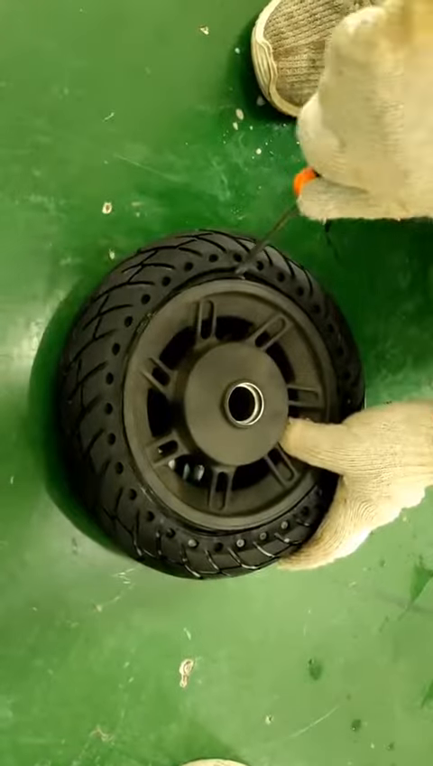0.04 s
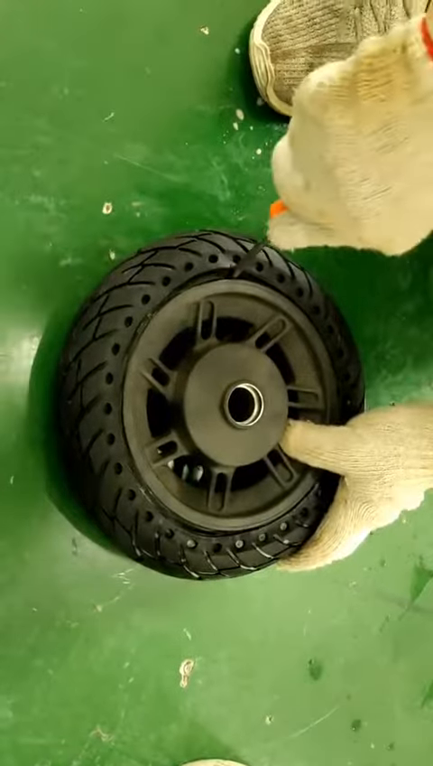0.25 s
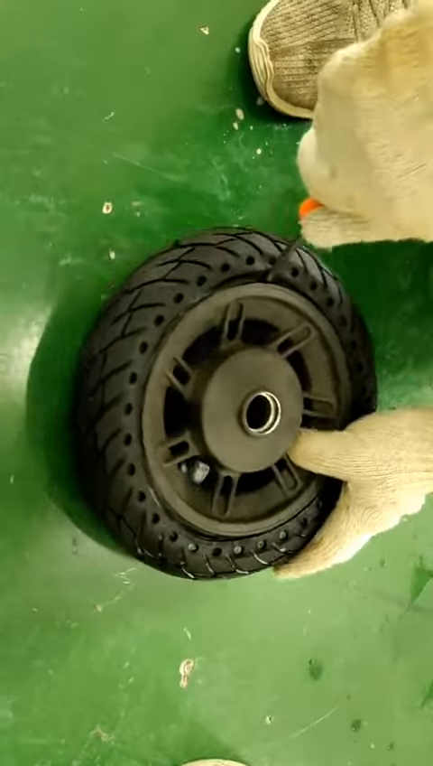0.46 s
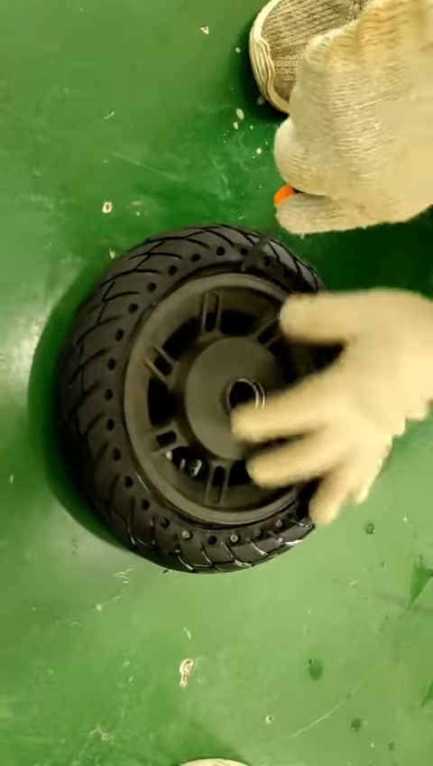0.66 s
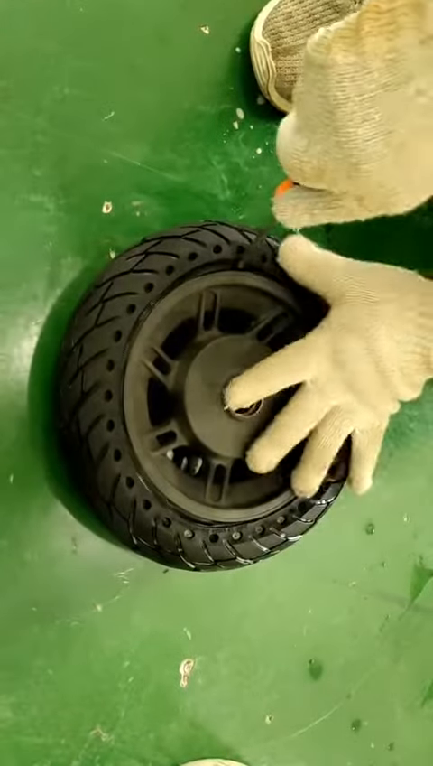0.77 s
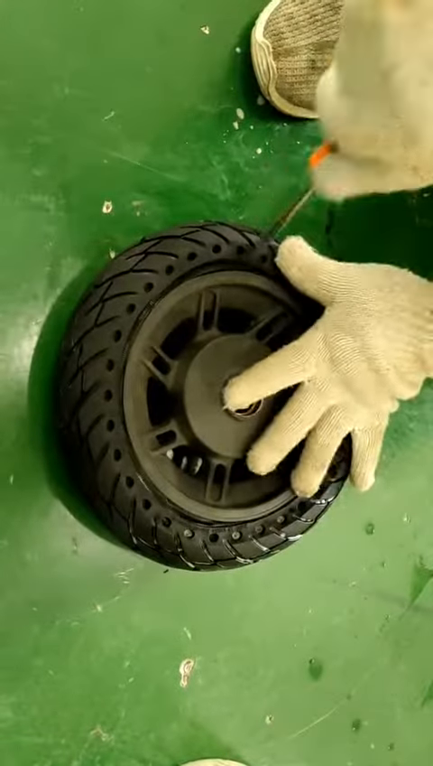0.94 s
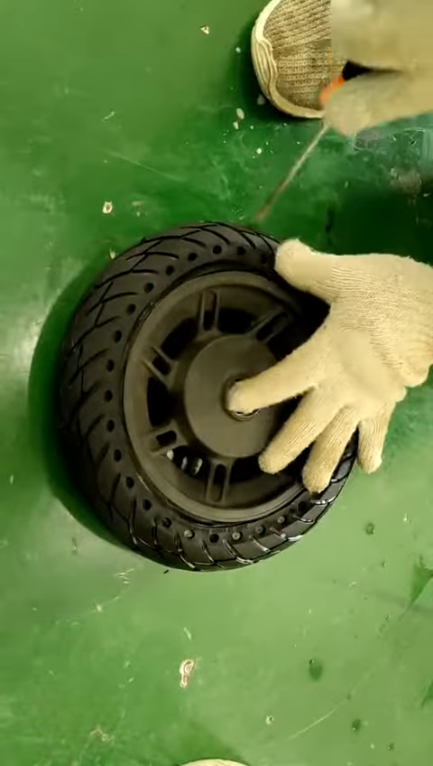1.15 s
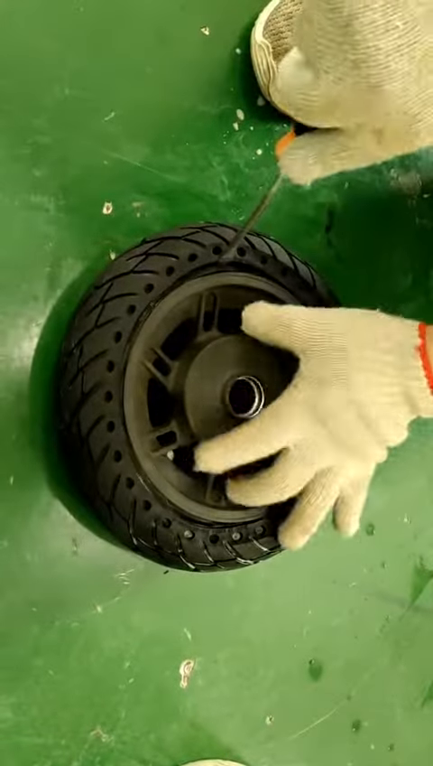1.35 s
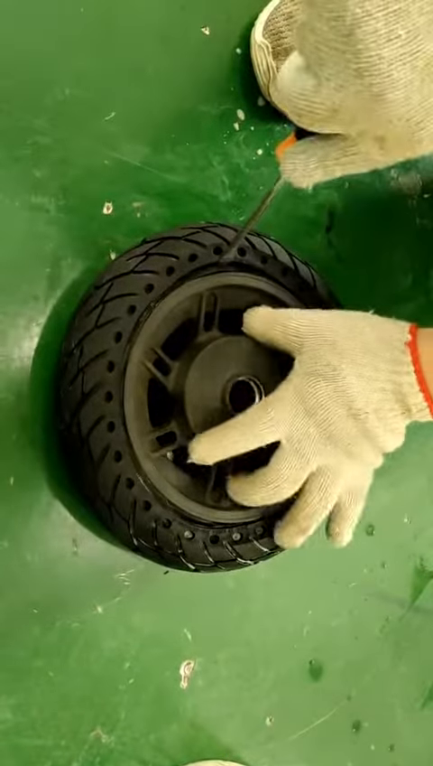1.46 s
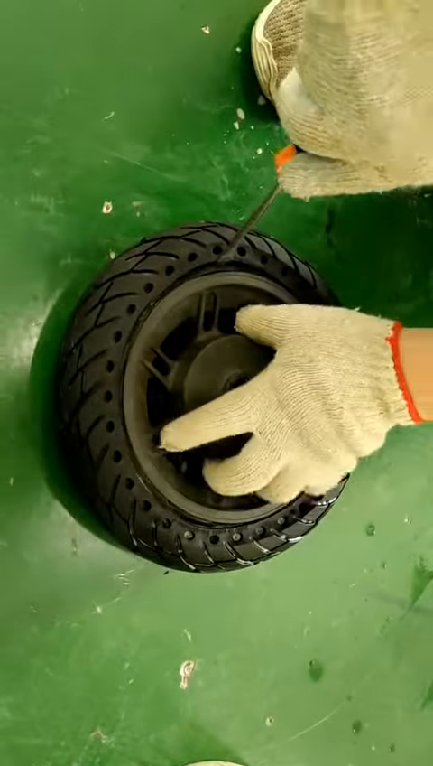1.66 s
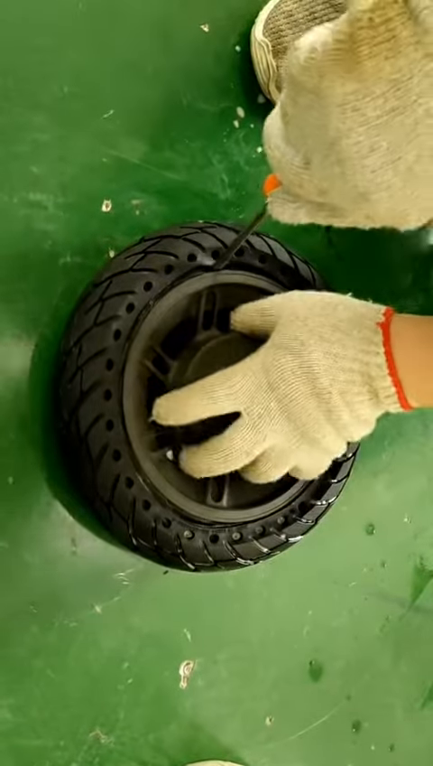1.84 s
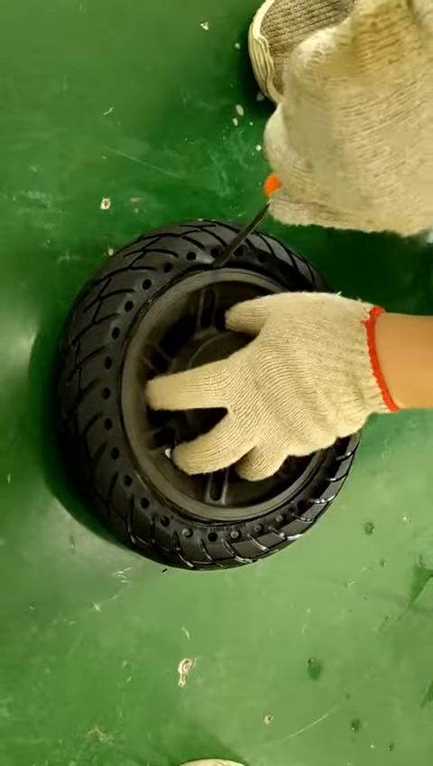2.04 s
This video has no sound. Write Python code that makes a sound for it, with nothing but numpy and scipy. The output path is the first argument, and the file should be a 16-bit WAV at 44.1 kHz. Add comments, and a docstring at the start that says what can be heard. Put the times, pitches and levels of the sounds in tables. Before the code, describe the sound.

Steel lever snaps loudly against a wheel rim, then soft knocks in a humming workshop.

```python
"""A workshop floor: a steel lever is worked between a small rubber tire and its rim.
Twice it slips, ever faster: the rubber squeaks and the steel jerks along with a short rising rasp.
The first slip ends in a hard snap on the rim that rings in the room. Gloved hands bump the wheel
over steady machine noise, and an automatic gain control ducks the mix after the snap."""
import sys
import numpy as np
from scipy import signal
from scipy.fft import rfft, irfft
from scipy.io import wavfile
from scipy.ndimage import uniform_filter1d, minimum_filter1d

SR = 44100
rng = np.random.default_rng(int(sys.argv[2]) if len(sys.argv) > 2 else 0)


def dump(signal):
    """Clip the signal to [-1, 1] and save it as 16-bit WAV at the path in sys.argv[1]."""
    limited = np.clip(np.atleast_2d(signal).T, -1, 1)
    pcm = np.round(limited * 32767).astype(np.int16)
    wavfile.write(sys.argv[1], SR, pcm)


N = 92610
T = np.arange(N) / SR

# The rubber's stick-slip glide, one list per slip: time_s, rate_hz, level_db
SLIPS = [
    [(.232, 614, -44), (.246, 701, -42.5), (.259, 795, -31.5), (.267, 1530, -41), (.274, 1463, -32.5),
     (.279, 1134, -26), (.286, 1090, -43)],
    [(.94, 600, -64), (.952, 679, -48), (.962, 706, -58), (.968, 737, -40), (.978, 770, -45),
     (.987, 833, -42), (.995, 1225, -43), (1.003, 1570, -46), (1.014, 1483, -42), (1.023, 1440, -51)],
]
# Tone of the rubber: freq_hz, gain_db
RUBBER_EQ = [(500, -51), (610, -11), (740, 11), (950, -2.5), (1180, -15), (1500, -1), (1800, -4),
             (2100, -25), (4000, -73)]
# Jerks of steel over the rim: centre_s, half_length_s, level_db, squeal_pitch_hz, hiss_db
STEEL_JERKS = [(0.25, 0.016, -43.5, 2376, -45.5), (0.2613, 0.0032, -28, 2554, -45),
               (0.2661, 0.0021, -23.5, 2700, -30.5), (0.2697, .0017, -30, 3250, -31),
               (.2755, .0024, -19, 2130, -39), (.2822, .0036, -26, 2160, -48),
               (.2781, 0.0022, -22, 3097, -26.5), (0.377, 0.0027, -34, 2800, -70),
               (0.961, 0.012, -52, 2800, -64), (.9765, 0.0019, -38, 2430, -62),
               (0.987, 0.0037, -45.5, 2760, -62), (.9972, 0.0056, -38, 2493, -55),
               (1.003, .004, -39, 2940, -48), (1.013, 0.0029, -31.5, 2994, -56),
               (1.0181, 0.0027, -40, 2420, -39.5), (1.034, 0.0074, -48, 2920, -54.5)]
# Resonances of lever and rim: pitch_hz, width_hz, gain_db
STEEL_BODY = [(2212, 270, -0.5), (2443, 335, 2), (2675, 290, 2), (3055, 200, 2), (3446, 310, -6.5),
              (3910, 400, -18)]
# Tone of the scraping hiss: freq_hz, gain_db
HISS_EQ = [(2500, -19), (4200, -6), (5600, -8.5), (6400, -5.5), (6980, 6), (7500, -13.5), (8800, -11),
           (9900, -41), (10700, -44), (11600, -9.5), (12300, -17)]
# The lever hits the rim and chatters once: start_s, level_db
SNAP_HITS = [(.2875, -2.5), (.2883, -9.5)]
# Short modes, the crack of the snap: pitch_hz, gain_db, t60_s
CRACK_MODES = [(784, -33.5, 0.046), (1230, -18, 0.019), (1710, -6.5, 0.0097), (2255, -8.5, 0.014),
               (2680, -1, 0.006), (2830, -42, 0.078), (3260, -45, .008), (6360, -23, 0.0092),
               (7700, -22, .006), (11200, -42, .008)]
# Long, faint ring of the metal: pitch_hz, gain_db, t60_s
RING_MODES = [(745, -11, .6), (1493, -8, .7), (2152, 0, .95), (2240, -3, .7), (2675, -4, .7),
              (2768, -1, .95), (3126, -9, .6)]
# Tone of the whole snap: freq_hz, gain_db
SNAP_EQ = [(400, -43), (560, -16), (700, 9), (1200, -2), (1600, -5), (2300, 0), (3500, -3), (4300, -22),
           (5500, -12), (6500, 0), (8600, -3), (9900, -30), (11500, 3)]
# Dull knocks of the wheel on the floor: start_s, level_db, pitch_hz, t60_s
WHEEL_KNOCKS = [(0.19, -26, 68, 0.046), (.232, -22, 141, 0.02), (.2772, -25, 765, 0.085),
                (0.55, -35, 266, 0.075), (.759, -40.5, 720, .05), (0.769, -35, 140, 0.048),
                (.811, -36.5, 206, 0.16), (0.964, -47, 110, 0.026), (1.803, -36, 223, 0.17)]
# Light ticks of the lever: start_s, level_db, t60_s
LEVER_TICKS = [(0.2208, -37, 0.046), (.96, -51, 0.014), (2.064, -51.5, 0.06)]
# Bright fizz of those ticks: freq_hz, gain_db
TICK_EQ = [(500, -53), (2400, 19), (3500, 4), (5000, 0), (7000, 10), (8800, 10), (10000, -37), (11700, 9)]
# Light rubbing on the rim: time_s, level_db
RUB_ENVELOPE = [(0, -45), (.05, -57.5), (.09, -48.5), (.14, -61), (.22, -53.5)]
# Tone of the scatter off nearby surfaces: freq_hz, gain_db
SCATTER_EQ = [(500, -4), (1500, -21), (3000, -3), (5000, -3), (8000, -7), (12000, 8)]
# Tone of the room reverb: freq_hz, gain_db
ROOM_EQ = [(200, -2), (480, -5), (780, 3.5), (1150, -2.5), (1500, 5.5), (2100, -3.5), (2700, -1.5),
           (3400, -2), (5000, -0.5), (7000, -0.5), (8200, 9.5), (10000, -21), (11800, -6)]
# Decay of the room reverb: freq_hz, t60_s
ROOM_DECAY = [(200, 0.17), (800, .75), (1500, 0.98), (2700, 1), (4000, 0.65), (7000, 0.6), (12000, 0.35)]
# Bed of machine noise: freq_hz, gain_db
MACHINE_EQ = [(15, -40), (25, -4), (37, 3), (49, -1), (107, -0.5), (166, -9.5), (215, -5.5), (271, -10),
              (300, -8.5), (325, -12.5), (479, -27), (621, -24.5), (783, -19), (847, -23.5), (1040, -27),
              (1190, -27.5), (1540, -32.5), (1990, -31.5), (2390, -24), (3710, -37.5), (5190, -46),
              (7080, -36), (9920, -58), (11300, -46.5), (12200, -45.5), (15900, -67), (22000, -120)]
# Machine hum: pitch_hz, level_db
HUM_TONES = [(50.5, -48), (100, -61), (300.5, -56.5), (805, -65.5)]
# Late midrange swell in the bed: time_s, level_db
SWELL_ENVELOPE = [(1.4, -80), (1.75, -63), (1.93, -56), (2.1, -62)]


def lever_snap(ring_db=-44, contact_s=0.00014):
    """The lever strikes the rim: damped modes crack and the metal rings on faintly."""
    modes = CRACK_MODES + [(hz, ring_db + db, t60) for hz, db, t60 in RING_MODES]
    hits = np.zeros(N)
    for start, hit_db in SNAP_HITS:
        attack = np.clip((T - start) / contact_s, 0, 1)
        hits += attack * sum(mode(start, hit_db + db, hz, t60) for hz, db, t60 in modes)
    return apply_eq(hits, SNAP_EQ)


def rubber_squeak(slip, jitter=0.05, edge_s=0.0012):
    """Quickening stick-slip pulses, each with a puff of grit, sound through the rubber."""
    times, rate_hz, level_db = np.transpose(slip)
    cycles = np.cumsum(np.interp(T, times, rate_hz) * (1 + jitter * wobble(60))) / SR
    pulses = unit(sum(np.cos(2 * np.pi * k * cycles) / k for k in range(1, 4)))
    puffs = 0.77 + np.exp(-(cycles % 1) / 0.2)
    grit = unit(puffs * rng.standard_normal(N))
    voice = level_out(apply_eq(0.51 * pulses + 0.98 * grit, RUBBER_EQ), 220)
    gate = np.clip(np.minimum(T - times[0], times[-1] - T) / edge_s + 1, 0, 1)
    return gate * voice * amp(np.interp(T, times, level_db))


def steel_scrape(squeal_share=0.57, rise_per_s=9, jitter=0.028, grit_db=2):
    """Each jerk of the lever rasps the rim, squeals briefly upward and throws off a gritty hiss."""
    grit = rng.standard_normal(N) * amp(grit_db * wobble(20))
    body = sum(amp(db) * resonate(grit, hz, width) for hz, width, db in STEEL_BODY)
    rasp = level_out(body, 130)
    hiss = unit(apply_eq(grit, HISS_EQ))
    drift_s = jitter * np.cumsum(wobble(30)) / SR
    scrape = np.zeros(N)
    for centre, half_length, db, hz, hiss_db in STEEL_JERKS:
        t = T - centre
        squeal = np.sqrt(2) * np.sin(2 * np.pi * hz * (t + rise_per_s * t ** 2 / 2 + drift_s))
        steel = np.sqrt(squeal_share) * squeal + np.sqrt(1 - squeal_share) * rasp
        envelope = np.exp(-(t / half_length) ** 2 / 2)
        scrape += envelope * (amp(db) * steel + amp(hiss_db) * hiss)
    return scrape


def handling():
    """The wheel knocks on the floor, the lever ticks and the rim is lightly rubbed."""
    knocks = sum(mode(*knock) for knock in WHEEL_KNOCKS)
    fizz = unit(apply_eq(rng.standard_normal(N), TICK_EQ))
    ticks = sum(amp(db) * (T >= start) * decay(abs(T - start), t60) for start, db, t60 in LEVER_TICKS)
    rub = noise_band(hz=2520, width_hz=380) * fader(RUB_ENVELOPE) * (T < RUB_ENVELOPE[-1][0])
    return knocks + fizz * ticks + rub


def near_scatter(x, level_db=-18, t60_s=0.28, build_s=0.031):
    """Quick, bright reflections off things close to the wheel."""
    tail = unit(rng.standard_normal(N) * decay(T, t60_s) * np.minimum(T / build_s, 1)) / np.sqrt(N)
    return amp(level_db) * signal.fftconvolve(apply_eq(x, SCATTER_EQ), tail)[:N]


def room_reverb(x, level_db=-14.5, build_s=0.031):
    """A diffuse tail builds up, then lingers in the mids as bass and treble die away."""
    hz, t, bands = signal.stft(rng.standard_normal(N), SR, nperseg=256)
    tail = signal.istft(bands * decay(t, spectrum(ROOM_DECAY, hz)[:, None]), SR)[1][:N]
    tail = unit(tail * np.minimum(T / build_s, 1)) / np.sqrt(N)
    return amp(level_db) * signal.fftconvolve(apply_eq(x, ROOM_EQ), tail)[:N]


def machine_bed(noise_db=-42.5, waver_rad=0.68):
    """Machines give a steady rumble and hiss, a wavering hum and a slight late swell."""
    bed = amp(noise_db) * unit(apply_eq(rng.standard_normal(N), MACHINE_EQ))
    for hz, db in HUM_TONES:
        phase = 2 * np.pi * (hz * T + rng.random())
        waver = waver_rad * noise_band(hz=3.7, width_hz=9.8)
        bed += amp(db) * np.sqrt(2) * np.sin(phase + waver)
    return bed + noise_band(hz=970, width_hz=940) * fader(SWELL_ENVELOPE)


def amp(db):
    """Decibels to gain."""
    return 10 ** (np.asarray(db) / 20)


def unit(x):
    """Scales to rms 1."""
    return x / np.sqrt(np.mean(x ** 2) + 1e-20)


def level_out(x, samples):
    """Holds the short-time rms at 1."""
    return x / np.sqrt(abs(uniform_filter1d(x ** 2, samples)) + 1e-12)


def fader(points):
    """A gain ride through (time_s, level_db) points."""
    return amp(np.interp(T, *np.transpose(points)))


def decay(t, t60):
    """A fade that drops 60 dB in t60 seconds."""
    return np.exp(-np.log(1000) * t / t60)


def mode(start, db, hz, t60):
    """A struck, dying sine."""
    t = np.maximum(T - start, 0)
    return amp(db) * decay(t, t60) * np.sin(2 * np.pi * hz * t)


def spectrum(points, hz):
    """Joins (freq_hz, value) points on a log frequency axis."""
    freqs, values = np.transpose(points)
    return np.interp(np.log(hz + 1), np.log(freqs + 1), values)


def apply_eq(x, points):
    """Shapes x with a curve of (freq_hz, gain_db) points."""
    gain = amp(spectrum(points, np.fft.rfftfreq(2 * N, 1 / SR)))
    return irfft(rfft(x, 2 * N) * gain)[:len(x)]


def pass_filter(x, hz, kind, order=2):
    """A high-pass or low-pass without phase shift."""
    return signal.sosfiltfilt(signal.butter(order, hz, kind, fs=SR, output="sos"), x)


def resonate(x, hz, width_hz):
    """A steep peak: the same resonator twice in series."""
    r = np.exp(-np.pi * width_hz / SR)
    for _ in range(2):
        x = 2 * signal.lfilter([1 - r], [1, -r * np.exp(2j * np.pi * hz / SR)], x).real
    return x


def noise_band(hz, width_hz):
    """Noise through a steep resonance, rms 1."""
    return unit(resonate(rng.standard_normal(N), hz, width_hz))


def wobble(samples):
    """Quick random flutter, rms 1."""
    return unit(uniform_filter1d(rng.standard_normal(N), samples))


def scene():
    """Lever and wheel over the machine bed; the reverb send drops from the second slip on."""
    wheel = sum(rubber_squeak(slip) for slip in SLIPS) + steel_scrape() + lever_snap() + handling()
    second_slip_s, late_send_db = SLIPS[1][0][0], -10.5
    send = amp(late_send_db * (T > second_slip_s))
    return (wheel + near_scatter(wheel) + room_reverb(send * wheel) + machine_bed())[None]


def record(dry):
    """Gain control ducks on loud sound, the bass most, holds and recovers; lows and top are trimmed."""
    threshold_db, slope, treble_share = -29, 0.72, 0.28
    attack_s, hold_s, release_db_per_s = 0.011, 0.31, 35
    split_hz, low_cut_hz, high_cut_hz = 640, 36.4, 12250
    power = signal.lfilter(np.ones(441) / 441, 1, dry[0] ** 2)  # 10 ms average
    target_db = slope * np.maximum(10 * np.log10(power + 1e-12) - threshold_db, 0)
    half_hold = int(hold_s * SR / 2)
    held_db = -minimum_filter1d(-target_db, 2 * half_hold + 1, origin=half_hold, mode="constant")
    released_db = np.maximum.accumulate(held_db + release_db_per_s * T) - release_db_per_s * T
    lag = np.exp(-1 / (attack_s * SR))
    duck_db = signal.lfilter([1 - lag], [1, -lag], released_db)
    bass = pass_filter(dry, split_hz, "low")
    ducked = bass * amp(-duck_db) + (dry - bass) * amp(-treble_share * duck_db)
    trimmed = pass_filter(ducked, low_cut_hz, "high", order=3)
    high_cut = signal.firwin(401, high_cut_hz, window=("kaiser", 8), fs=SR)
    return signal.oaconvolve(trimmed, high_cut[None], "same")


dry = scene()
out = record(dry)
dump(out)
```